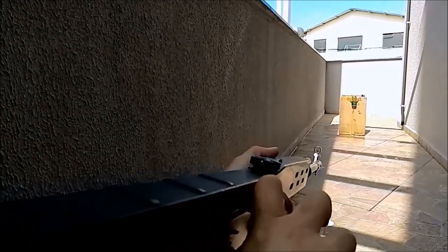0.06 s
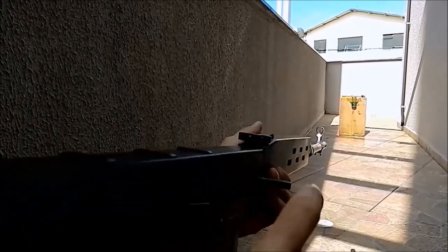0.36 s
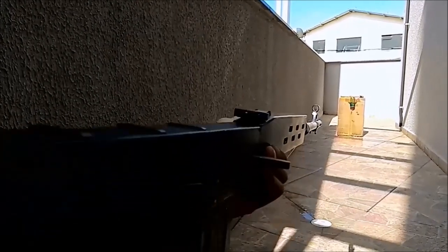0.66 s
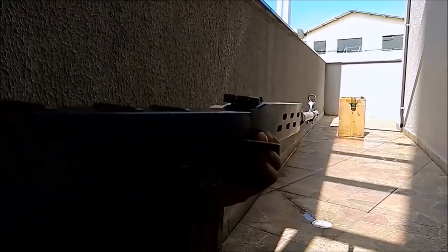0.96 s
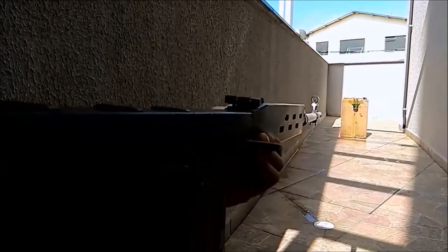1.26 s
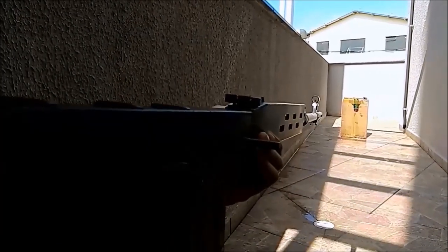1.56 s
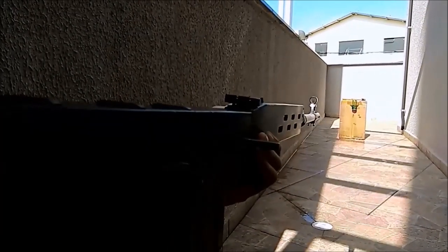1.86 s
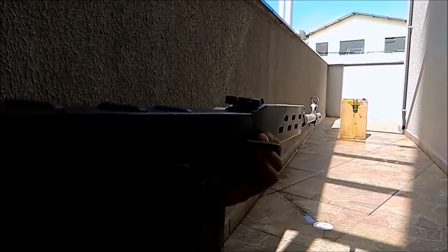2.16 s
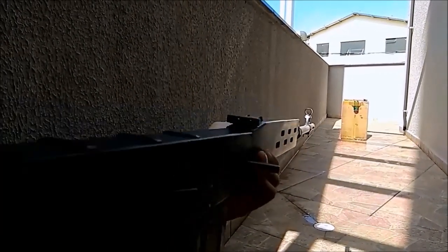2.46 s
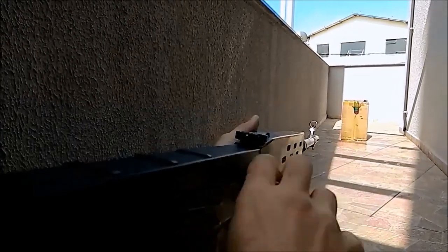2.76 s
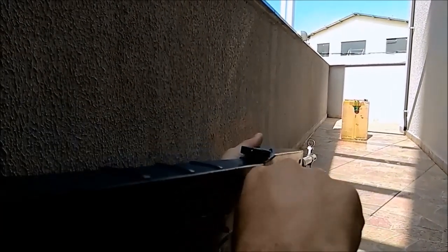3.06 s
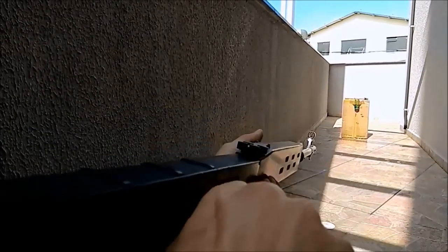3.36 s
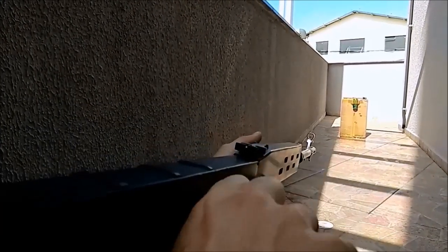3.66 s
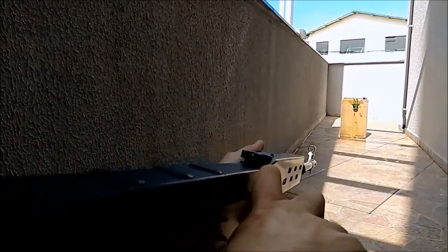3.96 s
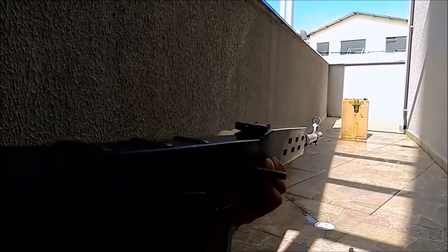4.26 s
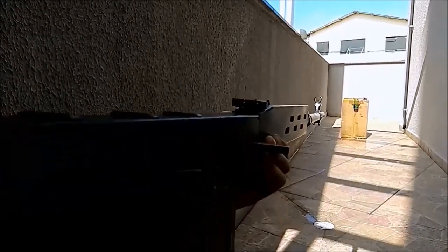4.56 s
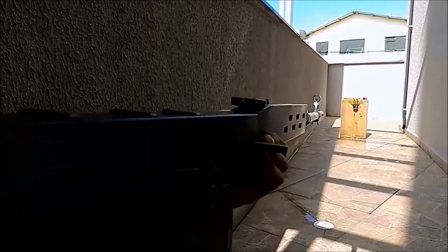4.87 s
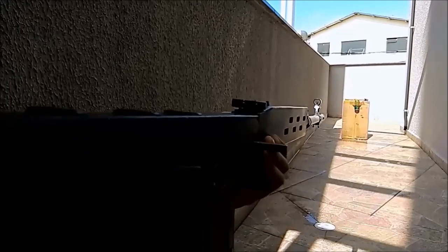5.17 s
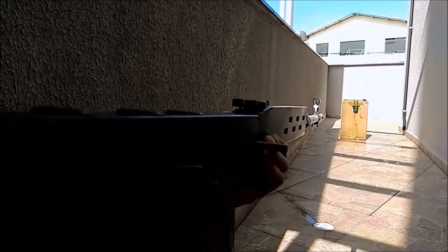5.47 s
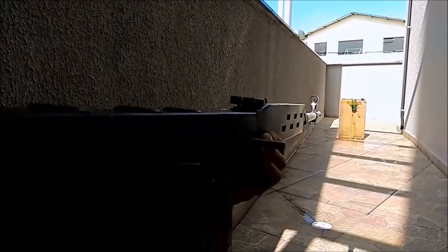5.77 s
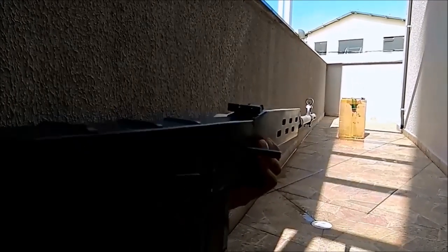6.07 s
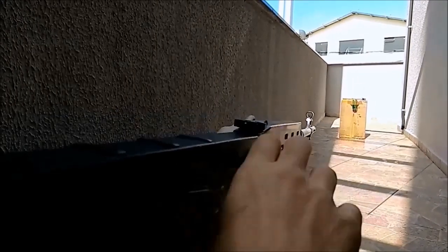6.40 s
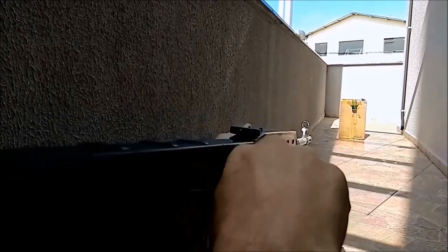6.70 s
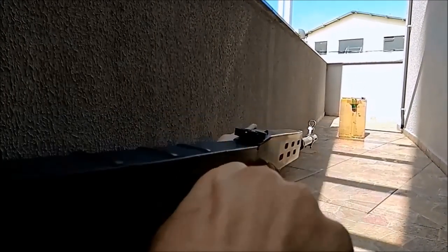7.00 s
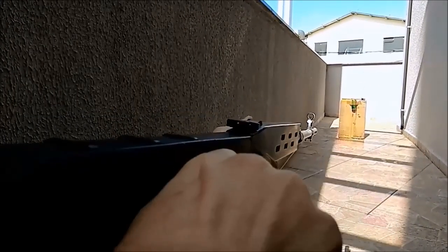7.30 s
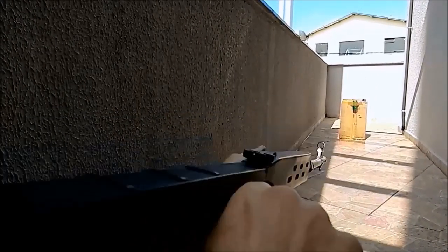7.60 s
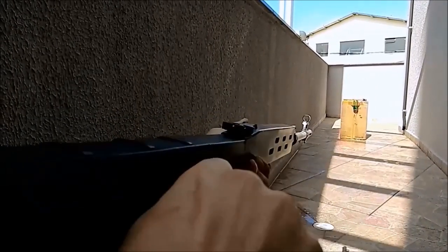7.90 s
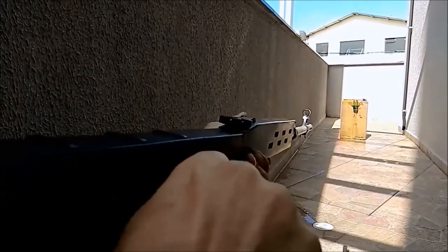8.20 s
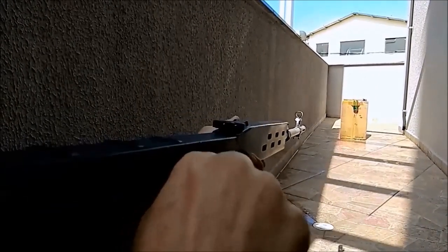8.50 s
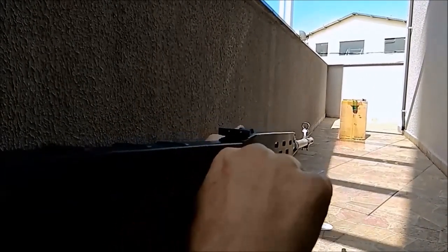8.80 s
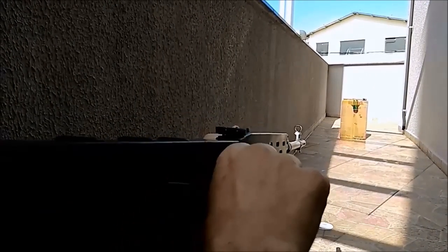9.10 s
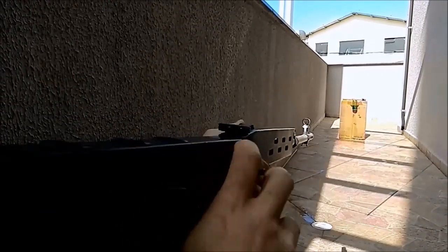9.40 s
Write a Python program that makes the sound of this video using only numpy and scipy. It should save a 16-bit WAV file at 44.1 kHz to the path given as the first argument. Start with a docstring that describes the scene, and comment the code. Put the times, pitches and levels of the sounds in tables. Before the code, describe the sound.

A spring airsoft rifle is heard up close in a narrow walled patio, over faint distant traffic. At the start its bolt slides and latches with a sharp double click, followed by soft hand rubs and small ticks. At 2.1 seconds it fires: a loud crack, the pellet smacking a box almost at once, a short wall echo and a faint spring whine lasting a second. Hands bump the hollow stock dully around 3 seconds. From 3.2 to 4 seconds the bolt scrapes, rattles and clacks, sharpest at 3.4. Quiet handling leads to a second loud shot and pellet smack at 5.8 seconds, with a thin, wavering spring ring. From 6.8 to 8.9 seconds the bolt is worked repeatedly in short scrapes, clicks and clacks. The traffic swells slightly toward the end, near 9.5 seconds.

```python
"""Spring airsoft rifle in a narrow patio.

Two close shots: the piston slams and rebounds, the pellet smacks a box at the far end,
the walls answer and the mainspring rings on. Around the shots the bolt slides and latches,
hands rub and bump the hollow stock, and distant traffic murmurs."""
import sys
import numpy as np
from scipy import signal
from scipy.fft import rfft, irfft
from scipy.io import wavfile
from scipy.ndimage import uniform_filter1d

SR = 44100
rng = np.random.default_rng(int(sys.argv[2]) if len(sys.argv) > 2 else 0)


def log_audio(samples):
    """Write samples as a 16-bit WAV file to the path given in sys.argv[1]."""
    # one column per channel
    frames = np.atleast_2d(samples).T
    # limit to full scale, then quantise
    limited = np.clip(frames, -1, 1)
    pcm = np.round(limited * 32767).astype(np.int16)
    wavfile.write(sys.argv[1], SR, pcm)


N = 416744

# Source spectra. Each row: frequency in Hz, relative spectral density in dB.
TRAFFIC_SPECTRUM = [(15, -63), (25, -46.5), (114, -5.5), (145, -5.5), (180, -1), (301, -9), (394, -17.5),
                    (575, -18), (936, -17.5), (1130, -16), (1440, -22), (2000, -22), (2350, -28.5),
                    (3080, -32.5), (16000, -63.5)]
BUMP_SPECTRUM = [(40, -26), (90, -4), (140, 11), (210, -3.5), (330, -10.5), (700, -76), (2000, -62)]
SKIN_SPECTRUM = [(100, -19.5), (450, -14), (750, 3), (2000, -1.5), (5000, -5), (8000, 4), (10500, 5),
                 (15500, -2)]
BOLT_SPECTRUM = [(35, -51), (60, -25.5), (262, -6), (448, 1.5), (593, -6.5), (749, 0.5), (862, -2),
                 (1700, 0.5), (2520, -2), (3270, -2.5), (6740, -4.5), (10000, -2.5), (16000, -14.5)]
CLICK_SPECTRUM = [(24, -44.5), (40, -24), (329, -3.5), (444, -1.5), (831, -2), (1150, 4.5), (1240, -1),
                  (2570, -3), (3140, -6.5), (5050, -5), (5580, -5.5), (8550, -1), (9940, 2.5), (14800, -8),
                  (16000, -12)]
PISTON_SPECTRUM = [(24, -60), (40, -26.5), (87, -19.5), (345, -5.5), (455, -13), (790, 2.5), (1240, -5),
                   (2320, -2), (2700, -7), (2910, -5.5), (3140, -5.5), (7540, -5.5), (10200, -1),
                   (14500, -11), (16000, -19.5)]
PELLET_SPECTRUM = [(24, -61.5), (40, -38), (176, -0.5), (354, -1.5), (444, -4), (770, -3), (1370, -8),
                   (1480, -4), (1950, -1.5), (3830, -2), (4800, -6.5), (6330, 0), (9940, -0.5),
                   (14500, -18), (16000, -14)]
# Patio decay. Each row: frequency in Hz, base T60 in seconds.
PATIO_DECAY = [(100, 0.24), (300, 0.41), (900, 0.42), (2500, 0.35), (7000, 0.32), (15000, 0.25)]
# Resonances in handling and in shots. Each row: frequency in Hz, width in Hz, gain in dB.
RIFLE_RESONANCES = [(690, 130, -2), (1080, 90, -13), (1820, 38, -4), (2790, 24, -10), (4660, 29, -3),
                    (5470, 38, -2), (6240, 18, 1.5), (7400, 38, -2.5), (8230, 63, -2), (9130, 180, -4.5),
                    (9770, 320, -4), (10430, 330, -6), (11000, 90, -6)]
SHOT_RESONANCES = [(800, 18, -4.5), (914, 19, -11.5), (1953, 55, -2.5), (2290, 32, -1), (3120, 41, -5.5),
                   (3313, 26, -4.5), (4320, 120, -5), (5760, 35, 2.5), (6930, 37, -4.5), (8460, 100, -6.5),
                   (8490, 110, -3), (8800, 45, -6), (9870, 68, -8.5), (9830, 210, -4.5), (14300, 40, 0),
                   (14120, 70, 2.5)]
# Distant traffic. Each row: time in seconds, rumble in dB, tyre roar in dB.
TRAFFIC_LEVELS = [(0, -64, -53), (1, -68.5, -64), (1.999, -67, -62.5), (3.499, -62, -63.5),
                  (4.9, -66, -62.5), (5.7, -58.5, -54), (7.302, -63.5, -61), (8.2, -62.5, -63),
                  (8.8, -53.5, -57.5), (9.45, -53.5, -51)]
# Hands bumping the stock. Each row: start in seconds, level in dB.
HAND_BUMPS = [(1.786, -59), (2.94, -48), (2.991, -37.5), (3.051, -34.5), (3.125, -42), (4.395, -41),
              (4.626, -49)]
# Skin and sleeve on the stock. Each row: start in seconds, length in seconds, level in dB.
HAND_RUBS = [(0, 0.12, -50), (0.311, 0.165, -58), (0.553, 0.26, -52.5), (0.881, 0.1, -49.5),
             (2.453, 0.022, -43.5), (2.531, 0.02, -29), (4.254, 0.034, -43.5), (4.387, 0.13, -48.5),
             (4.659, 0.072, -45), (6.087, 0.38, -50.5), (6.51, 0.056, -45.5)]
# Bolt travel. Each row: start in seconds, length in seconds, midway level in dB, swell in dB
# (positive grows louder along the stroke, negative fades), relative rattle of loose parts in dB.
BOLT_SLIDES = [(.06, .14, -34, 10, -12), (3.19, .14, -30, 23, -2), (3.34, 0.037, -35.5, -5, -9),
               (3.408, 0.046, -27.5, 0, -9.5), (3.885, .15, -36.5, 7, -3), (6.755, .15, -30.5, 24.5, -2),
               (7.615, 0.062, -27.5, 0, -3.5), (7.795, 0.065, -28.5, -5, 3), (8.595, .075, -37, -8.5, -8),
               (8.783, .11, -26.5, 6.5, 2.5)]
# Latch and bolt clicks. Each row: time in seconds, tick level in dB, weight (mass behind it) in dB.
LATCH_CLICKS = [(0.1613, -13.5, -5.5), (0.1867, -19.5, -4), (.3728, -49, 11.5), (1.464, -35.5, 3),
                (1.6664, -38.5, -7.5), (1.7896, -61, 14.5), (2.58, -34.5, 14.5), (3.242, -17, -18),
                (3.3995, -15.5, -27.5), (3.4126, -17.5, -12.5), (3.4214, -2, -6.5), (3.6401, -14, -0.5),
                (3.6526, -19.5, 9.5), (3.7064, -15, 3), (3.9914, -13.5, -7), (4.0187, -33.5, 19),
                (4.4002, -45.5, 6.5), (5.214, -34, 2.5), (5.405, -36, -12), (5.7208, -46.5, 5),
                (6.1458, -42, 2.5), (6.2842, -42, -0.5), (6.317, -43, -8), (6.8035, -20.5, -16.5),
                (6.8612, -16.5, -4), (6.9565, -19, 3.5), (7.3736, -16, 5.5), (7.6111, -26.5, 10),
                (7.6731, -22, 7.5), (7.8006, -23, 0), (7.9012, -17, 10.5), (8.0042, -19, -21.5),
                (8.0758, -19.5, -9.5), (8.3134, -29, -11.5), (8.426, -10, -5), (8.448, -18.5, 6),
                (8.8067, -21.5, 14.5), (8.839, -15.5, -13)]
# Rifle cavities by name. Each entry: centre in Hz, width in Hz, T60 in seconds.
CAVITY_BANDS = {"stock": (730, 660, .095), "cylinder": (1206, 300, .17), "receiver": (2150, 1350, .11),
                "frame": (4000, 4600, 0.19)}
# Blows that ring a cavity. Each row: start in seconds, level in dB, cavity name.
CAVITY_HITS = [(.185, -22.5, "receiver"), (.187, -31.5, "stock"), (.541, -51.5, "stock"),
               (1.465, -39.5, "stock"), (1.79, -56, "stock"), (1.665, -50.5, "frame"), (2.53, -33, "frame"),
               (2.58, -44, "stock"), (3.407, -29.5, "cylinder"), (3.424, -23.5, "cylinder"),
               (3.424, -20.5, "frame"), (3.709, -32.5, "stock"), (3.949, -35.5, "stock"),
               (4.017, -27.5, "receiver"), (5.215, -39.5, "stock"), (5.405, -53.5, "frame"),
               (6.86, -33, "receiver"), (6.966, -36, "stock"), (7.658, -37.5, "stock"),
               (7.902, -34.5, "stock"), (8.423, -26.5, "receiver")]
# Mainspring ringing. Each row: start and end in seconds, hum in dB, whine in dB,
# beating twin in dB relative to the whine.
SPRING_RINGS = [(2.111, 3.146, -54, -49.5, -20), (5.78, 6.743, -75.5, -40.5, -5.5)]
# Shot impacts. Each row: time in seconds, level in dB, body gain below 2 kHz in dB,
# sizzle gain above 11 kHz in dB, T60 in seconds, left minus right in dB.
PISTON_HITS = [(2.1012, -10, 3.5, 2, 0.073, -1), (2.120, -9.5, -9, -4.5, 0.18, 0),
               (5.7735, -8, 2.5, 1.5, 0.079, 0), (5.791, -11, -11, -3.5, 0.089, 4.5)]
PELLET_HITS = [(2.166, -13, 1.5, -1, 0.28, -0.27), (5.841, -8.5, -2.5, 6.5, 0.16, -1.8)]


def undb(db):
    """Decibels to gain."""
    return 10 ** (np.asarray(db) / 20)


def unit(x):
    """Scale to rms 1."""
    return x / np.sqrt(np.mean(x ** 2))


def pan(db):
    """Constant-power gains for a left minus right level."""
    return unit(undb([[db / 2], [-db / 2]]))


def add(out, start_s, x):
    """Mix x into out from start_s on."""
    i = max(int(start_s * SR), 0)
    out[:, i:i + x.shape[-1]] += x[..., :N - i]


def piece(x, start_s, t):
    """Stretch of x from start_s, as long as t."""
    return np.take(x, int(start_s * SR) + np.arange(len(t)), axis=-1, mode="wrap")


def log_interp(hz, points):
    """Read (Hz, value) points on a log-frequency axis."""
    knots_hz, values = np.transpose(points)
    return np.interp(np.log(hz + 1), np.log(knots_hz), values)


def noise_bands(colour, edges_hz=(), coherent_hz=500):
    """Coloured stereo noise in overlapping bands; the bass is alike in both ears."""
    hz = np.arange(N // 2 + 1) * SR / N
    mid, side = rfft(rng.standard_normal((2, N)))
    coherence = .55 / (1 + (hz / coherent_hz) ** 4)
    stereo = mid * np.sqrt(1 + coherence) + np.array([[1], [-1]]) * side * np.sqrt(1 - coherence)
    spectrum = stereo * undb(log_interp(hz, colour))
    lowpasses = [0 * hz] + [1 / (1 + (hz / edge) ** 8) for edge in edges_hz] + [1 + 0 * hz]
    return [irfft(spectrum * band, N) for band in np.diff(lowpasses, axis=0)]


def roughness(depth_db, grain_samples):
    """Fast random gain flicker."""
    return undb(depth_db * unit(uniform_filter1d(rng.standard_normal(N), size=grain_samples)))


def burst(t, rise_s, hold_s, t60_s):
    """Quick rise, brief contact, free decay."""
    return np.minimum(t / rise_s, 1) * undb(-60 * np.maximum(t - hold_s, 0) / t60_s)


def strike(t, lead_s, hold_s, t60_s, graze_db):
    """Parts graze with growing force, meet at lead_s, then ring down."""
    graze = undb(graze_db - 30 * (1 - np.minimum(t / lead_s, 1)))
    return np.where(t < lead_s, graze, burst(t - lead_s, .00037, hold_s, t60_s))


def ring(x, modes):
    """Add body resonances at constant total energy."""
    y = x + sum(undb(db) * signal.lfilter(*signal.iirpeak(hz, hz / width_hz, SR), x + 1e-18)
                for hz, width_hz, db in modes)
    return y * np.std(x) / np.std(y)


def glance(x, paths, gain):
    """A bounce off hand or stock combs the treble; paths (0-1) sets each ear's delay."""
    lags = np.interp(paths, [0, 1], [8, 64]).astype(int)
    bounce = np.array([np.pad(ear, (lag, 0))[:len(ear)] for ear, lag in zip(x, lags)])
    return (x + gain * bounce) / np.hypot(1, gain)


def far_ear(x, lag_samples=18):
    """The rifle is on the right, so the left ear hears it later."""
    return np.array([np.pad(x[0], (lag_samples, 0))[:N], x[1]])


def patio(x, t60_scale=1, gap_s=.0041, build_s=.004, flutter_s=.0128):
    """Dense wall reflections, pulsing as sound crosses the passage."""
    t = np.arange(SR) / SR
    edges_hz = 150 * 2. ** np.arange(7)
    centres_hz = np.append(edges_hz, 2 * edges_hz[-1]) / np.sqrt(2)
    bands = noise_bands([(20, 0), (20000, 0)], edges_hz)
    t60s_s = t60_scale * log_interp(centres_hz, PATIO_DECAY)
    tail = sum(band[:, :SR] * undb(-60 * t / t60_s) for band, t60_s in zip(bands, t60s_s))
    onset = np.clip((t - gap_s) / build_s + .5, 0, 1)
    flutter = 1 + .3 * np.cos(2 * np.pi * t / flutter_s)
    return signal.fftconvolve(x, unit(tail * onset * flutter) / np.sqrt(SR), axes=1)[:, :N]


def traffic(waver_db=-3, engine_hz=181, engine_db=-53):
    """Distant rumble and tyre roar; an engine drone stands out as the rumble grows."""
    t = np.arange(N) / SR
    times_s, *levels_db = np.transpose(TRAFFIC_LEVELS)
    rumble_db, roar_db = (np.interp(t, times_s, db) for db in levels_db)
    knots_s = np.linspace(0, N / SR, 90)
    low_drift, roar_drift, pitch_drift = (np.interp(t, knots_s, w) for w in rng.standard_normal((3, 90)))
    rumble, roar = (unit(b) for b in noise_bands(TRAFFIC_SPECTRUM, [300]))
    phase = 2 * np.pi * np.cumsum(engine_hz * (1 + .03 * pitch_drift)) / SR
    drone = np.sin(phase) * undb(engine_db + 2 * (rumble_db - rumble_db.max()))
    low = (rumble * undb(rumble_db) + drone) * undb(waver_db * low_drift)
    return low + roar * undb(roar_db + waver_db * roar_drift / 2)


def hand_bumps():
    """Dull thuds of the grip shifting on the hollow stock."""
    out, t = np.zeros((2, N)), np.arange(SR // 5) / SR
    thud = unit(noise_bands(BUMP_SPECTRUM)[0])
    envelope = burst(t, rise_s=.0032, hold_s=.0099, t60_s=.17)
    for start_s, db in HAND_BUMPS:
        add(out, start_s, undb(db) * piece(thud, start_s, t) * envelope)
    return out * pan(db=-3)


def friction(strokes, colour, body_db, grain_db, fade_s, pan_db, patio_db):
    """Sliding contact: hiss broken into tiny catches, swelling or fading, ringing the rifle."""
    body, hiss = (unit(b) for b in noise_bands(colour, [2000]))
    catches = unit(roughness(grain_db, grain_samples=110))
    out = np.zeros((2, N))
    for start_s, length_s, db, swell_db, *_ in strokes:
        t = np.arange(int((length_s + 2 * fade_s) * SR)) / SR
        ease = np.sin(np.pi / 2 * np.clip(np.minimum(t, t[-1] - t) / (2 * fade_s), 0, 1)) ** 2
        progress = np.clip((t - fade_s) / length_s, 0, 1)
        push = undb(db + swell_db * (progress - .5)) * ease
        treble = glance(piece(hiss, start_s, t), rng.random(2), gain=.66)
        scrape = treble + undb(body_db) * piece(body, start_s, t)
        add(out, start_s - fade_s, push * piece(catches, start_s, t) * scrape)
    out = ring(out, RIFLE_RESONANCES)
    return .79 * (far_ear(out) * pan(pan_db) + undb(patio_db) * patio(out))


def hand_rubs(swell_db=-8.5):
    """Soft, bright brushes on plastic, fading as the hand comes to rest."""
    strokes = [(*rub, swell_db) for rub in HAND_RUBS]
    return friction(strokes, SKIN_SPECTRUM, body_db=-16.5, grain_db=1.5, fade_s=.013,
                    pan_db=-4, patio_db=-5.5)


def bolt_slides():
    """The bolt scrapes along its guide."""
    return friction(BOLT_SLIDES, BOLT_SPECTRUM, body_db=-4.5, grain_db=-1, fade_s=.008,
                    pan_db=-2.5, patio_db=-7)


def chatter(rate_hz=35, gain_db=.5, max_clicks=6):
    """Click rows for loose parts, as strong as the slide that shakes them."""
    rows = []
    for start_s, length_s, db, swell_db, rattle_db in BOLT_SLIDES:
        for k, jitter in enumerate(rng.random(max_clicks)):
            progress = (k + jitter) / (rate_hz * length_s)
            if progress < 1:
                click_db = db + swell_db * (progress - .5) + gain_db + rattle_db
                rows.append((start_s + progress * length_s, click_db, 0))
    return rows


def clicks(tick_patio_db=-11, body_patio_db=-8, lead_s=.004):
    """Hard parts meet: a short tick, plus a clack and low knock that grow with the blow's weight."""
    near, to_walls, t = np.zeros((2, N)), np.zeros((2, N)), np.arange(SR // 10) / SR
    bands = [unit(b) for b in noise_bands(CLICK_SPECTRUM, [2000, 7000], coherent_hz=1297)]
    envelopes = [strike(t, lead_s, hold_s=.0028, t60_s=t60_s, graze_db=-12)
                 for t60_s in (.045, .022, .016)]
    for time_s, db, weight_db in LATCH_CLICKS + chatter():
        parts_db = (weight_db - 10, .43 * weight_db - 5, 0)
        knock, clack, tick = (undb(db + part_db) * piece(band, time_s, t) * envelope
                              for part_db, band, envelope in zip(parts_db, bands, envelopes))
        paths = rng.random(2)
        clack, tick = (glance(x, paths, gain=.55) for x in (clack, tick))
        pan_db = -8 + .15 * weight_db  # heavy blows shake the whole rifle and sound more central
        add(near, time_s - lead_s, .83 * knock * pan(pan_db / 2) + (clack + tick) * pan(pan_db))
        add(to_walls, time_s - lead_s, undb(body_patio_db) * (knock + clack) + undb(tick_patio_db) * tick)
    return ring(far_ear(near) + patio(to_walls), RIFLE_RESONANCES)


def cavities(pan_db=-2, patio_db=-7):
    """Clustered shell and cavity resonances ring on after a blow."""
    out, t = np.zeros((2, N)), np.arange(SR // 2) / SR
    for start_s, db, cavity in CAVITY_HITS:
        hz, width_hz, t60_s = CAVITY_BANDS[cavity]
        edges_hz = [max(hz - width_hz / 2, hz / 4), hz + width_hz / 2]
        band = signal.butter(2, edges_hz, "bandpass", fs=SR, output="sos")
        cluster = unit(signal.sosfilt(band, rng.standard_normal((2, len(t)))))
        add(out, start_s, undb(db) * cluster * burst(t, rise_s=.0015, hold_s=.011, t60_s=t60_s))
    return out * pan(pan_db) + undb(patio_db) * patio(out)


def mainspring(hum_hz=414.5, hum_t60_s=6, whine_hz=3009, whine_t60_s=2.6, beat_hz=2.45, damp_s=.095):
    """The released coil hums and whines in a beating pair until the hand damps it."""
    out = np.zeros((2, N))
    ear_phase = np.array([[0], [np.pi / 2]])  # unequal distances to the ears
    for start_s, end_s, hum_db, whine_db, twin_db in SPRING_RINGS:
        t = np.arange(int((end_s - start_s) * SR)) / SR
        modes = [(hum_hz, hum_db, hum_t60_s), (whine_hz, whine_db, whine_t60_s),
                 (whine_hz + beat_hz, whine_db + twin_db, whine_t60_s)]
        tones = sum(undb(db - 60 * t / t60_s) * np.sin(2 * np.pi * hz * t + ear_phase)
                    for hz, db, t60_s in modes)
        add(out, start_s, tones * np.minimum((t[-1] - t) / damp_s, 1))
    return out


def impacts(hits, colour, hold_s, rattle_db, lead_s, graze_db):
    """Violent blows: a dense crack that rattles as it dies."""
    out, t = np.zeros((2, N)), np.arange(SR // 2) / SR
    body, crack, sizzle = noise_bands(colour, [2000, 11000])
    rms = np.std(body + crack + sizzle)
    rattle = roughness(rattle_db, grain_samples=90)
    for time_s, db, body_db, sizzle_db, t60_s, pan_db in hits:
        treble = piece(crack, time_s, t) + undb(sizzle_db) * piece(sizzle, time_s, t)
        treble = glance(treble, rng.random(2), gain=.63)
        sound = (undb(body_db) * piece(body, time_s, t) + treble) * piece(rattle, time_s, t) / rms
        force = strike(t, lead_s, hold_s, t60_s, graze_db) * np.minimum(t / lead_s, 1)
        add(out, time_s - lead_s, sound * force * undb(db) * pan(pan_db))
    return out


def shots(piston_patio_db=-5, pellet_patio_db=-4):
    """Piston slam and rebound, then pellet on the box; a long, strong tail follows each shot."""
    piston = impacts(PISTON_HITS, PISTON_SPECTRUM, hold_s=.015, rattle_db=1.5, lead_s=.004, graze_db=-8)
    pellet = impacts(PELLET_HITS, PELLET_SPECTRUM, hold_s=.0074, rattle_db=-1.8, lead_s=.007, graze_db=-5)
    walls = patio(undb(piston_patio_db) * piston + undb(pellet_patio_db) * pellet, t60_scale=1.76)
    return ring(piston + pellet + walls, SHOT_RESONANCES)


def scene():
    """Rifle and hands over distant traffic."""
    rifle = shots() + clicks() + cavities() + bolt_slides() + mainspring()
    return rifle + hand_rubs() + hand_bumps() + traffic()


def record(dry, top_hz=15800):
    """Soft peak clipping, then a steep low-pass."""
    lowpass = signal.ellip(10, .2, 70, top_hz, fs=SR, output="sos")
    return signal.sosfilt(lowpass, 1.18 * np.tanh(dry / 1.204))


dry = scene()
out = record(dry)
log_audio(out)
```